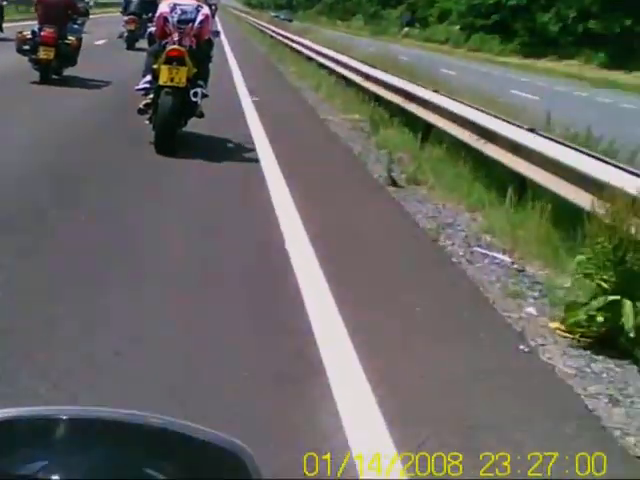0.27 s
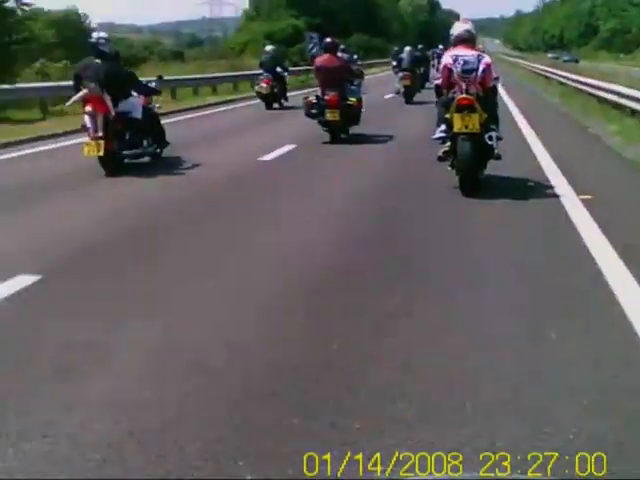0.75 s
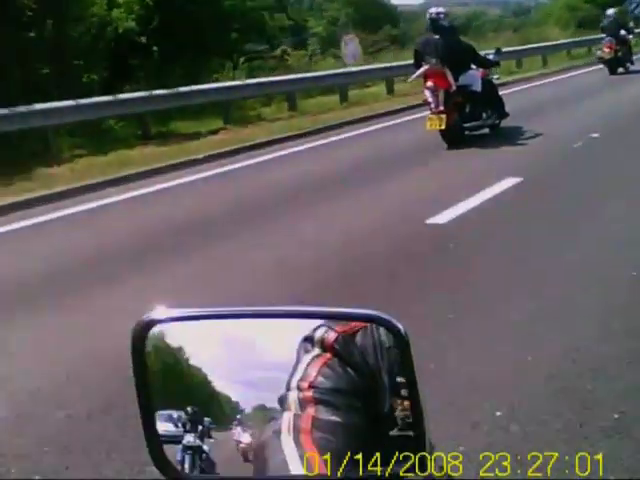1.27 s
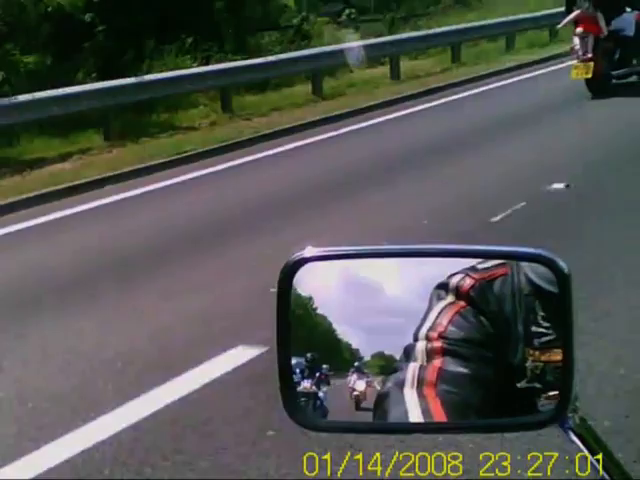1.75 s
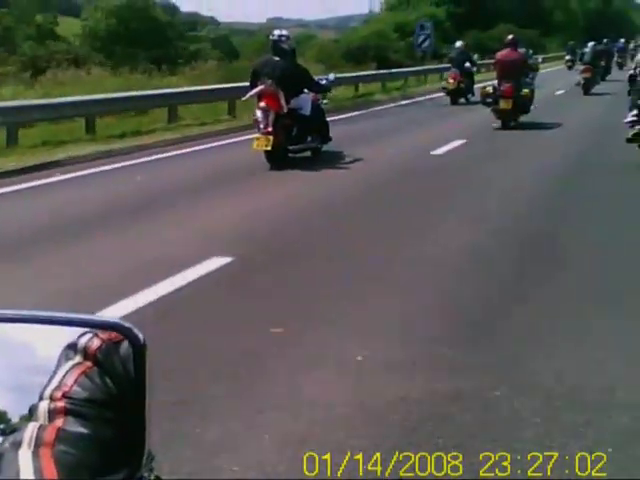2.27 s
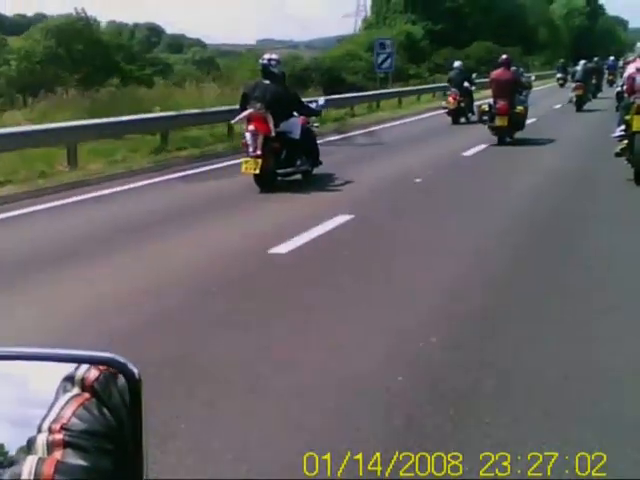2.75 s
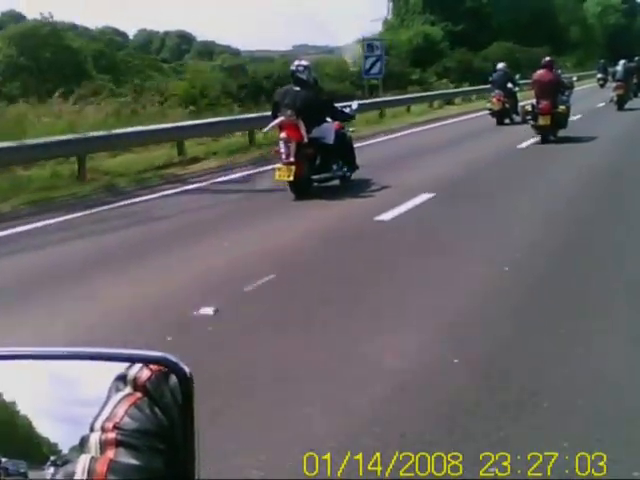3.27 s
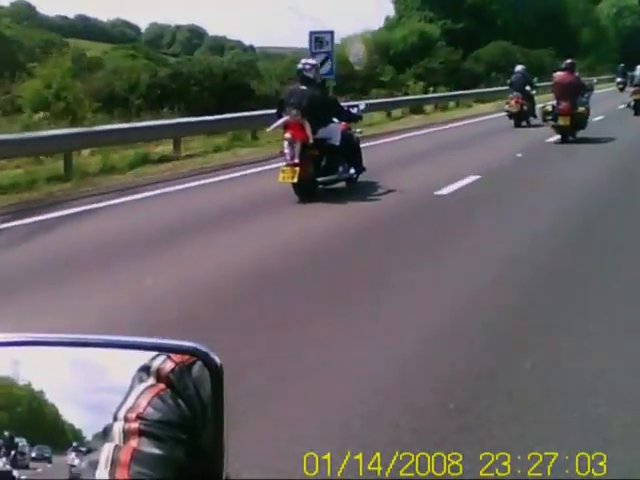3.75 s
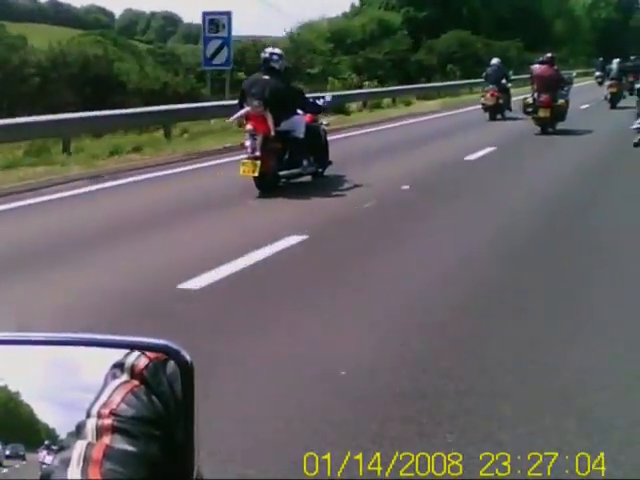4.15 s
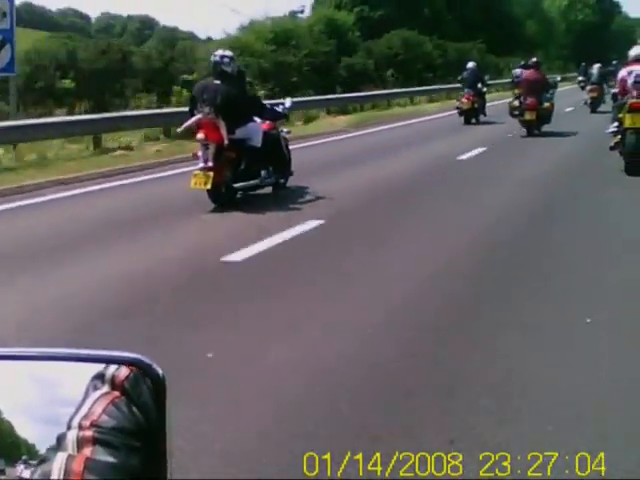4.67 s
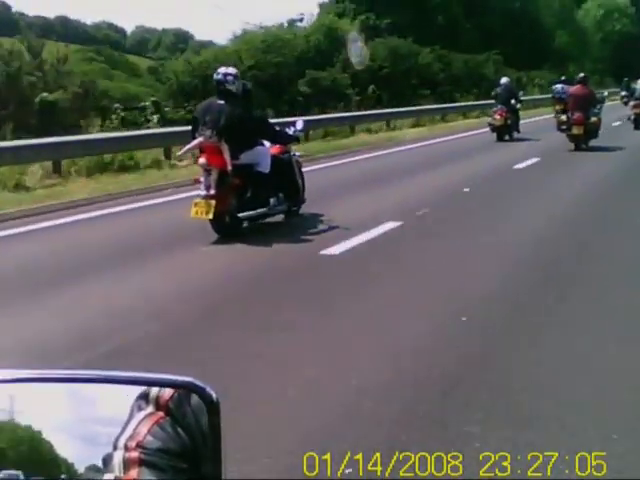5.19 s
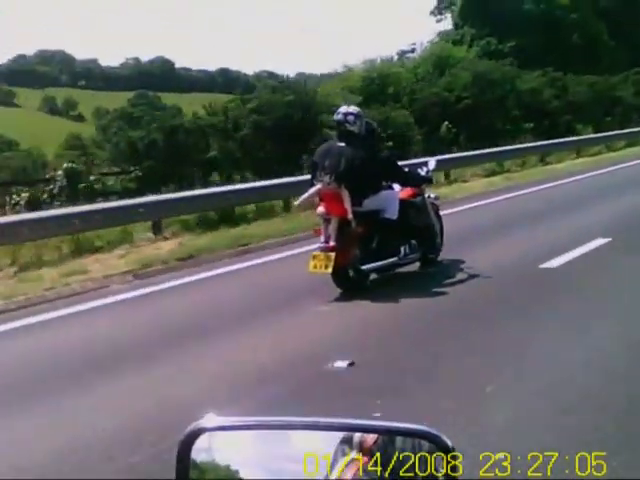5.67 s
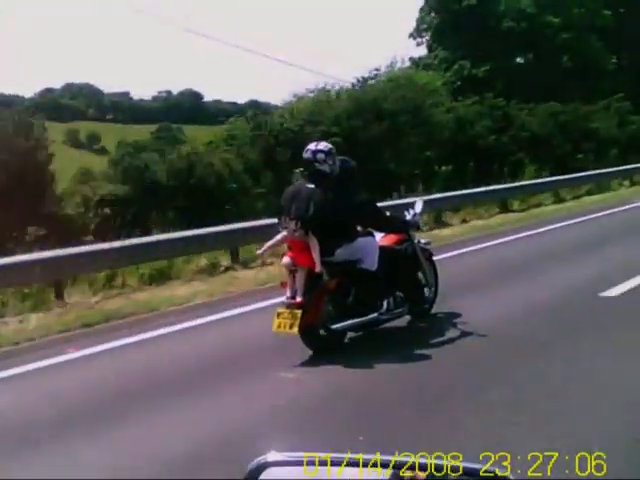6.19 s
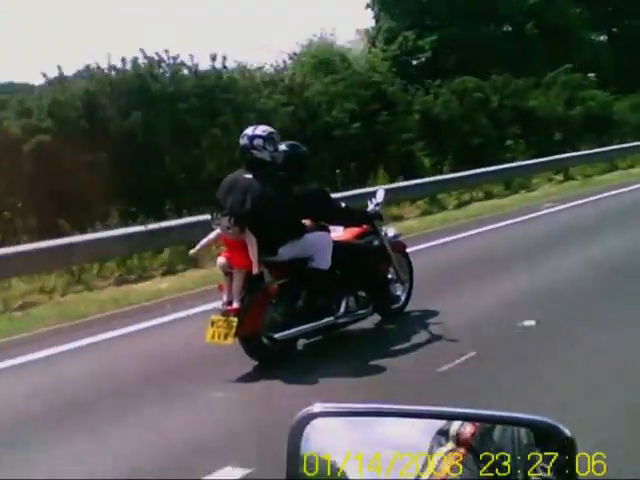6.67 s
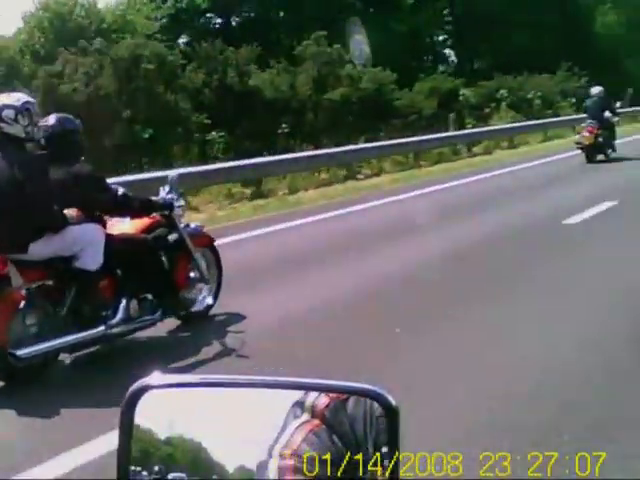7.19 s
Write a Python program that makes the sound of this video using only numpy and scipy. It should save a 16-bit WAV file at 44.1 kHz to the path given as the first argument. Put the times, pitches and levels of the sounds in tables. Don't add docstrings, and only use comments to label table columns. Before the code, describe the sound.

A motorcycle engine steadily climbs in pitch under heavy wind rumble and thumping, while a second bike drones ahead and draws away.

```python
import sys
import numpy as np
from scipy import signal
from scipy.fft import rfft, irfft, next_fast_len
from scipy.io import wavfile
from scipy.ndimage import uniform_filter1d, map_coordinates

SR = 44100
rng = np.random.default_rng(int(sys.argv[2]) if len(sys.argv) > 2 else 0)


def ratio_of_db(decibels):
    return 10 ** (np.asarray(decibels, float) / 20)


def pcm_store(signal):
    levels = np.round(np.clip(np.atleast_2d(signal), -1, 1) * 32767)
    wavfile.write(sys.argv[1], SR, levels.astype(np.int16).T)


N = 327663

# (time [s], firing rate [Hz], throttle [dB])
OWN_SPEED = [(0.0, 64.93, -5.5), (0.8, 66.43, -1), (1.6, 68.95, -1.5), (2.4, 73.53, -1.5),
             (3.2, 78.94, 0.2), (3.6, 82.95, -0.7), (4.0, 85.87, .3), (4.8, 90.46, 0.2), (5.6, 94.9, -0.7),
             (6.0, 96.04, -4), (6.4, 98.2, -5), (6.8, 100.6, -3), (7.43, 102.7, -1.5)]
# (order [x firing rate], level against the pipe [dB])
OWN_MAIN_ORDERS = [(3, 0), (4, .3), (5, -1)]
# (order [x firing rate], level against the frame curve [dB])
OWN_WEAK_ORDERS = [(1.5, -8), (2, 1), (3.5, -3.5), (4.5, -10.5), (6, -2), (7, -6.5), (8, 3)]
# (frequency [Hz], level [dB])
EXHAUST_RESONANCE = [(62, -21.5), (80, -24), (104, -30.5), (195, -35.5), (240, -34), (345, -30), (405, -32),
                     (450, -57.5), (520, -57)]
# (frequency [Hz], level [dB])
FRAME_PATH = [(40, -36), (140, -34), (170, -49), (205, -50), (230, -41), (400, -43), (450, -48), (530, -56),
              (600, -56), (650, -63), (700, -69), (850, -77)]
# (order, time [s], width [s])
ORDER_FADES = [
    (4, .08, 0.18),
    (4, 1.62, 0.047),
    (4, 2.62, 0.1),
    (3, 1.62, 0.13),
    (3, 2.2, 0.094),
]
# (order [x firing rate], pitch smear [%], level [dB])
GEAR_WHINE = [(23, 2.2, -65), (45.6, 1.7, -67.5)]
# (time [s], level [dB])
GEAR_LOAD = [(0, -9), (1, -4), (2, -7), (3, -5), (4.2, 0), (5, -1), (5.5, -9), (7.43, -12)]
# (frequency [Hz], boost [dB], width [Hz])
GEARBOX_RESONANCES = [(1540, 8, 120), (2240, 11, 130)]

# (time [s], firing rate [Hz], distance [m])
OTHER_RIDE = [(0.0, 86.35, 9), (0.8, 89.9, 10.1), (1.6, 93.86, 15.4), (2.4, 97.1, 15.8), (2.8, 100.1, 14.8),
              (4.0, 108.3, 16.8), (4.4, 108.3, 21.4), (5.2, 113.6, 22.3), (6.0, 116.3, 32.5),
              (6.6, 118.5, 46), (7.2, 121, 19.5), (7.43, 120.2, 41.6)]
# (order, level at the nearest [dB], fading with distance [x the 1/r law])
OTHER_MAIN_ORDERS = [(2, -37.5, .9), (4, -38, .7), (5, -39, 2.3)]
# (order, level against order 2 [dB])
OTHER_LOW_ORDERS = [(1, -6.5), (3, -8.5), (3.5, -13)]
# (order, level against order 5 [dB])
OTHER_HIGH_ORDERS = [(4.5, -8.5), (5.5, -11), (6, -13.5)]

# (time [s], level [dB], width [s])
GUST_SWELLS = [(.28, -23, .1), (.5, -25, .05), (.9, -24, .12), (1.58, -20, .12), (2.15, -22, .12),
               (2.75, -27, .06), (3.28, -28, .1), (3.45, -24, .08), (3.8, -27, .1), (4.25, -27, .06),
               (4.65, -25, .07), (4.85, -25, .07), (5.1, -26, .1), (5.5, -22, .12), (5.8, -21, .08),
               (6.0, -25, .05), (6.35, -20, .1), (6.65, -20, .1), (6.9, -23, .08), (7.25, -19, .07)]
# (time [s], push [full scale], width [s])
MEMBRANE_BLOWS = [(.185, .15, .01), (.224, -.14, .008), (.78, -.14, .011), (1.02, -.14, .011),
                  (1.5, .17, .011), (1.525, -.15, .009), (1.69, .17, .011), (1.722, -.14, .009),
                  (2.03, .16, .011), (3.35, -.14, .012), (3.46, -.17, .014), (5.29, .22, .011),
                  (5.32, -.18, .013), (5.84, .22, .013), (6.015, .15, .009), (6.037, -.26, .011),
                  (6.06, .14, .01), (6.132, -.3, .008), (6.312, .26, .01), (6.572, .33, .01),
                  (6.595, -.2, .009), (6.805, -.22, .006), (6.91, .22, .012), (7.29, .28, .012),
                  (7.317, -.36, .009), (7.365, .2, .011), (7.425, -.2, .025)]
# (time [s], airflow [dB], exposure of the port as the head turns [dB])
AIRFLOW = [(0.0, 2.5, 2.5), (.5, 2, 1), (.85, 2.7, 3), (1.2, -2, -7.5), (1.5, 0.1, 3.5), (1.75, -1.4, -0.5),
           (2.05, -2.5, -6.5), (2.5, -0.5, -1), (3.2, 2.2, -1.5), (3.7, .5, 2), (4.1, 0.5, -2),
           (4.85, 0, 3.5), (5.2, -.5, -1), (5.6, -0.4, 3.5), (6.0, -2.5, .8), (6.75, -0.2, 3.5),
           (7.05, -1, -1), (7.35, 2, 4.5)]
# (time [s], level [dB], decay [s])
PORT_SPURTS = [(1.047, -45, .006), (2.18, -45, .006), (4.932, -46, .006), (5.655, -47.5, .025),
               (5.94, -55, .03), (5.995, -53, .05), (6.065, -51, .06), (6.33, -56, .04),
               (6.49, -49.5, .035), (6.632, -45.5, .035), (6.681, -47.5, .045), (6.86, -55, .04),
               (7.124, -50, .008), (7.255, -50, .04)]

BUFFET_COLOUR = [(2, -10), (8, 0), (18, -1.5), (25, -3), (35, -5), (55, -10), (100, -20), (200, -33),
                 (400, -56), (1200, -120)]
# (frequency [Hz], level per Hz [dB])
ROAR_COLOUR = [(24, -37.5), (40, -23), (87, -0.5), (184, -10.5), (270, -12.5), (313, -12.5), (361, -13),
               (403, -13.5), (449, -15.5), (507, -20.5), (720, -32.5), (940, -64), (1580, -120)]
# (frequency [Hz], level per Hz [dB])
WASH_COLOUR = [(250, -83), (450, -22), (620, 0.5), (800, -0.5), (1100, -2.5), (1400, -6.5), (2200, -54.5),
               (5000, -100)]
# (frequency [Hz], level per Hz [dB])
HISS_COLOUR = [(680, -33.5), (1150, -5), (1270, -2), (1510, 3.5), (1710, -0.5), (2190, 1), (2750, -8.5),
               (3300, -14), (4290, -31.5), (7260, -120)]
# (frequency [Hz], level per Hz [dB])
FIZZ_COLOUR = [(1590, -28), (2700, -12), (3490, -6), (4040, -3), (4650, -10), (5700, -10), (6200, -8.5),
               (7000, -16.5), (7720, -16), (8600, -8.5), (9800, -18.5), (10900, -20.5), (14200, -53.5),
               (22000, -120)]
# (frequency [Hz], level per Hz [dB])
SPURT_COLOUR = [(200, -60), (450, -14), (800, 0), (2300, -1), (3200, -5), (4500, -9), (5500, -17),
                (7000, -27), (11000, -38)]
# (frequency [Hz], level per Hz [dB])
SEAM_COLOUR = [(5500, -62), (5950, -6.5), (6150, -3.5), (6400, -5), (7000, -63)]

# (time [s], change [dB])
GAIN_CUTS = [
    (3.481, -4.2),
    (5.333, -3),
    (6.145, -13),
]
# (frequency [Hz], level [dB])
CIRCUIT_TONES = [(5600, -87), (7400, -89.5), (9600, -95)]


def unit(x):
    return x / np.sqrt(np.mean(x ** 2) + 1e-20)


def curves(rows):
    s, *cols = np.transpose(rows)
    return [np.interp(np.arange(N) / SR, s, c) for c in cols]


def wobble(rate):
    steps = np.arange(0, N + 32, 32)
    knots = rng.standard_normal(int(N * rate / SR) + 4)
    coarse = map_coordinates(knots, [steps * rate / SR])
    return np.interp(np.arange(N), steps, coarse)


def bumps(rows):
    t = np.arange(N) / SR
    return sum(height * np.exp(-.5 * ((t - s) / width) ** 2) for s, height, width in rows)


def rush(spectrum, patchy_db):
    z = signal.stft(rng.standard_normal(N + SR), nperseg=512)[2]
    field = uniform_filter1d(rng.standard_normal(z.shape), size=6, axis=0)
    field = uniform_filter1d(field, size=10, axis=1)
    x = signal.istft(z * ratio_of_db(patchy_db * unit(field)), nperseg=512)[1]
    hz, db = np.transpose(spectrum)
    m = next_fast_len(len(x))
    colour = ratio_of_db(np.interp(np.log(np.fft.rfftfreq(m, 1 / SR) + 1), np.log(hz + 1), db))
    return unit(irfft(rfft(x, m) * colour, m)[:N])


def order_line(turns, multiple, db, flutter_db, drift):
    phase = 2 * np.pi * (multiple * turns + rng.random()) + drift * wobble(16)
    flutter = flutter_db * (wobble(12) + 0.61 * wobble(3.937))
    return np.sqrt(2) * ratio_of_db(db + flutter) * np.sin(phase)


def own_engine():
    hz, throttle_db = curves(OWN_SPEED)
    turns = np.cumsum(hz) / SR

    def along(response, order):
        at_hz, db = np.transpose(response)
        return np.interp(np.log(order * hz), np.log(at_hz), db)

    firing_db = along(EXHAUST_RESONANCE, 0.93) + 0.6 * throttle_db
    engine = order_line(turns, 1, firing_db, flutter_db=0.0, drift=0.11)
    for order, db in OWN_MAIN_ORDERS:
        fade_db = bumps([(s, -13, width) for faded, s, width in ORDER_FADES if faded == order])
        level_db = along(EXHAUST_RESONANCE, order) + db + throttle_db + fade_db
        engine = engine + order_line(turns, order, level_db, flutter_db=1.11, drift=.15)
    for order, db in OWN_WEAK_ORDERS:
        engine = engine + order_line(turns, order, along(FRAME_PATH, order) + db, flutter_db=2, drift=.3)
    return engine + gear_whine(hz), turns


def gear_whine(hz):
    whine = 0
    for order, smear, db in GEAR_WHINE:
        turns = np.cumsum(hz * (1 + smear / 100 * wobble(300))) / SR
        rung_db = sum(boost * np.exp(-.5 * ((order * hz - at_hz) / width) ** 2)
                      for at_hz, boost, width in GEARBOX_RESONANCES)
        whine = whine + order_line(turns, order, db + rung_db, flutter_db=1.2, drift=.6)
    return ratio_of_db(curves(GEAR_LOAD)[0]) * whine


def other_engine():
    hz, metres = curves(OTHER_RIDE)
    turns = np.cumsum(hz) / SR
    distance_db = 20 * np.log10(metres / 10)
    rows = [(order, db - fades * distance_db) for order, db, fades in OTHER_MAIN_ORDERS]
    second_db, fifth_db = rows[0][1], rows[-1][1]
    rows += [(order, second_db + db) for order, db in OTHER_LOW_ORDERS]
    rows += [(order, fifth_db + db) for order, db in OTHER_HIGH_ORDERS]
    return sum(order_line(turns, order, db, flutter_db=0.3, drift=0.18) for order, db in rows)


def buffeting(speed):
    lull = ratio_of_db(-28.5 + 9 * speed)
    gusts = bumps([(s, ratio_of_db(db + 1.5), width) for s, db, width in GUST_SWELLS])
    eddies = np.hypot(lull, gusts) * unit(ratio_of_db(1.5 * wobble(14)) * rush(BUFFET_COLOUR, patchy_db=-0.7))
    pinned = np.clip(bumps([(s, .75, 3 * width) for s, push, width in MEMBRANE_BLOWS]), 0, .75)
    blows = ratio_of_db(2.5) * bumps([(s, push, .82 * width) for s, push, width in MEMBRANE_BLOWS])
    return (1 - pinned) * eddies + blows


def wind(turns):
    flow_db, exposure_db = curves(AIRFLOW)
    speed = np.log2(curves(OWN_SPEED)[0] / OWN_SPEED[0][1])
    gust = 0.54 * wobble(30) + 0.72 * wobble(110) + 1.1 * np.sin(2 * np.pi * turns)
    roar_db = -26.5 - 7 * speed + 0.17 * exposure_db + 0.39 * flow_db + 0.29 * gust
    roar = ratio_of_db(roar_db) * rush(ROAR_COLOUR, patchy_db=-2.0)
    wash = ratio_of_db(-55 + exposure_db + 1.3 * gust) * rush(WASH_COLOUR, patchy_db=-0.4)
    hiss = ratio_of_db(-52 + flow_db + 0.2 * gust) * rush(HISS_COLOUR, patchy_db=0.75)
    fizz = ratio_of_db(-61.5 + 0.8 * flow_db + 0.52 * gust) * rush(FIZZ_COLOUR, patchy_db=0.5)
    return buffeting(speed) + roar + wash + hiss + fizz + seam_whistle() + spurts()


def spurts():
    t = np.arange(N) / SR
    shape = np.zeros(N)
    for s, db, decay in PORT_SPURTS:
        age = np.maximum(t - s, 0)
        shape += ratio_of_db(db) * (1 - np.exp(-age / 0.0021)) * np.exp(-age / decay)
    return shape * rush(SPURT_COLOUR, patchy_db=1.5)


def seam_whistle():
    return bumps([(1.52, ratio_of_db(-71), .42)]) * rush(SEAM_COLOUR, patchy_db=3)


def gain_control():
    recover_db_per_s = 2.75
    t, db = np.arange(N) / SR, np.zeros(N)
    for s, cut_db in GAIN_CUTS:
        returning = db[round(s * SR)] + cut_db + recover_db_per_s * (t - s)
        db = np.where(t < s, db, np.minimum(0, returning))
    return ratio_of_db(uniform_filter1d(db, size=100))


def electronics():
    t = np.arange(N) / SR
    tones = sum(np.sqrt(2) * ratio_of_db(db) * np.sin(2 * np.pi * hz * t) for hz, db in CIRCUIT_TONES)
    return tones + ratio_of_db(-77.5) * rng.standard_normal(N)


def scene():
    engine, turns = own_engine()
    return (engine + other_engine() + wind(turns))[None]


def roll_off(x):
    return signal.sosfilt(signal.butter(12, 11040, fs=SR, output="sos"), x)


def record(dry):
    coupled = signal.sosfilt(signal.butter(2, 6, "high", fs=SR, output="sos"), dry)
    held = coupled * gain_control()
    clipped = held / (1 + np.abs(held / .345) ** 8) ** (1 / 8)
    return roll_off(clipped + electronics())


dry = scene()
out = record(dry)
pcm_store(out)
```